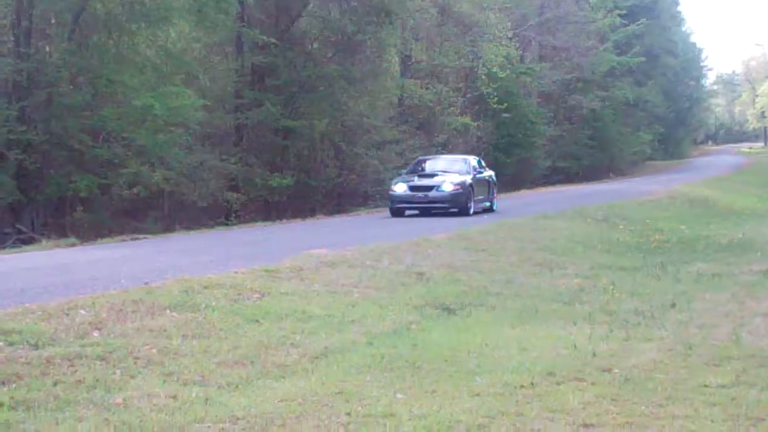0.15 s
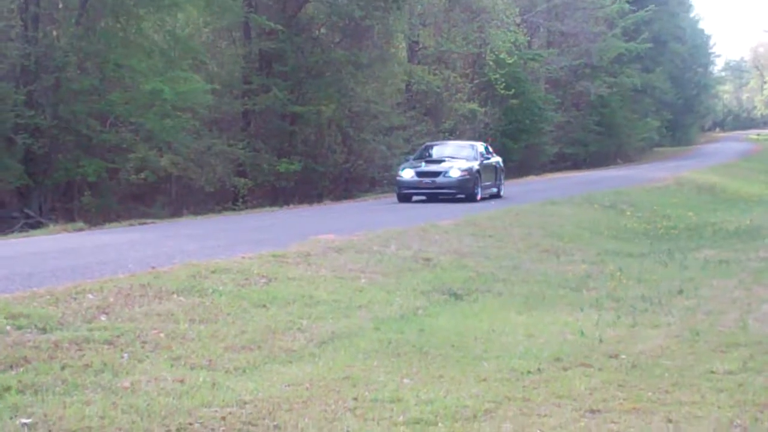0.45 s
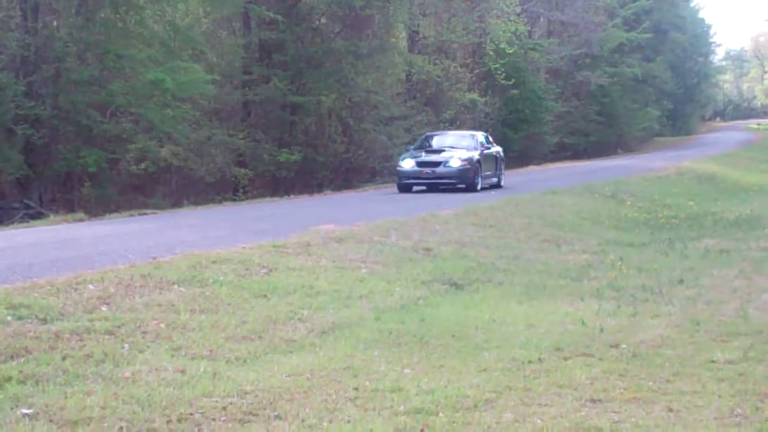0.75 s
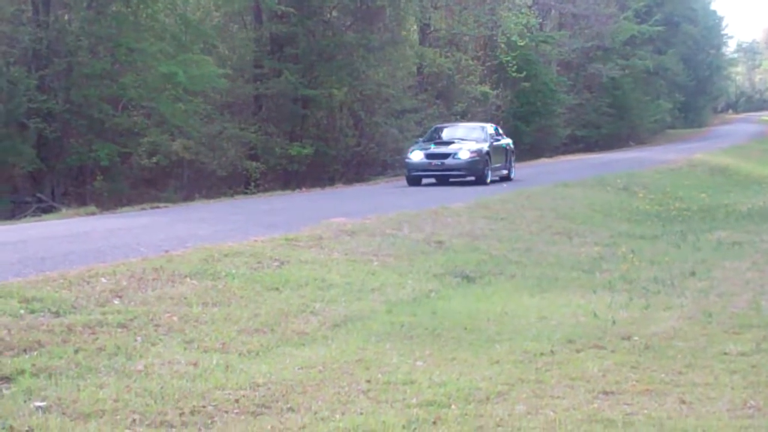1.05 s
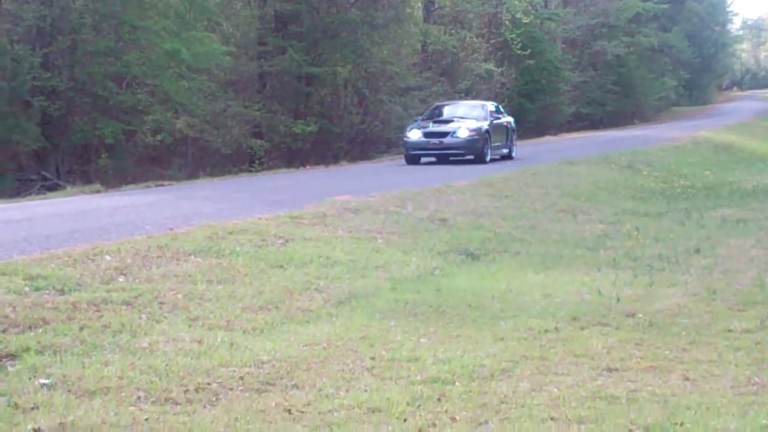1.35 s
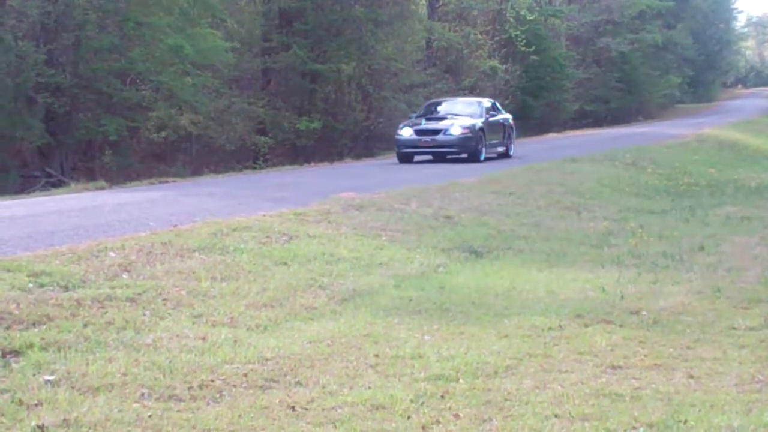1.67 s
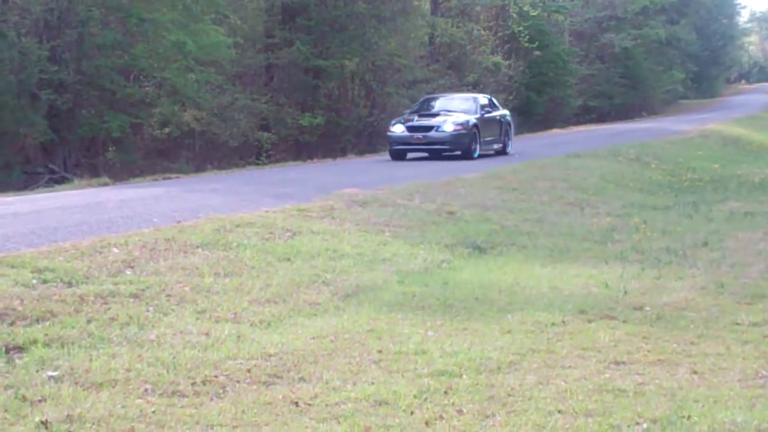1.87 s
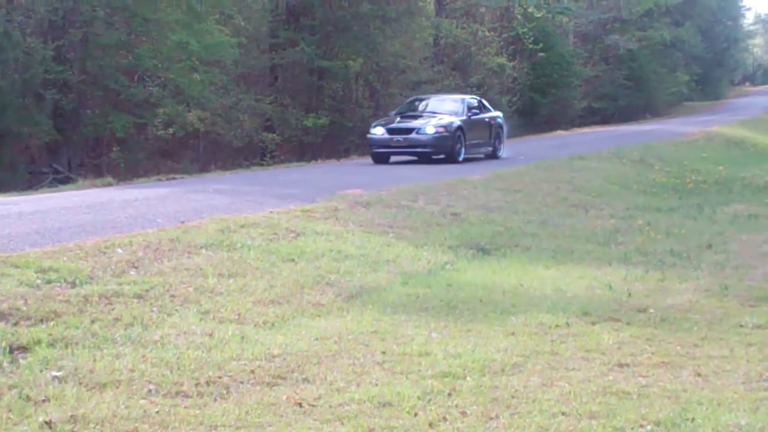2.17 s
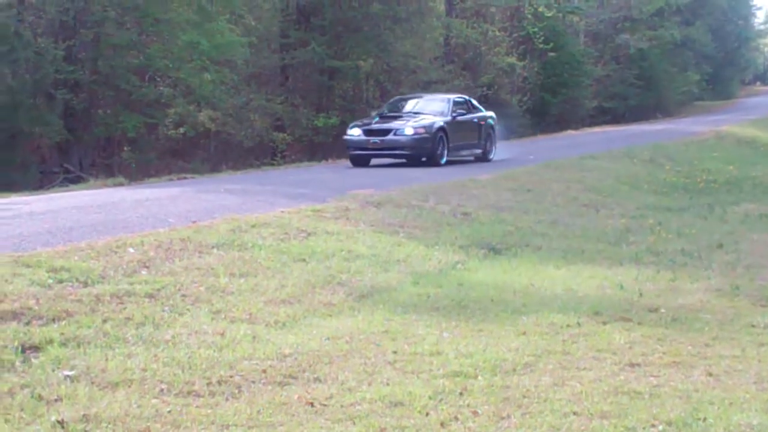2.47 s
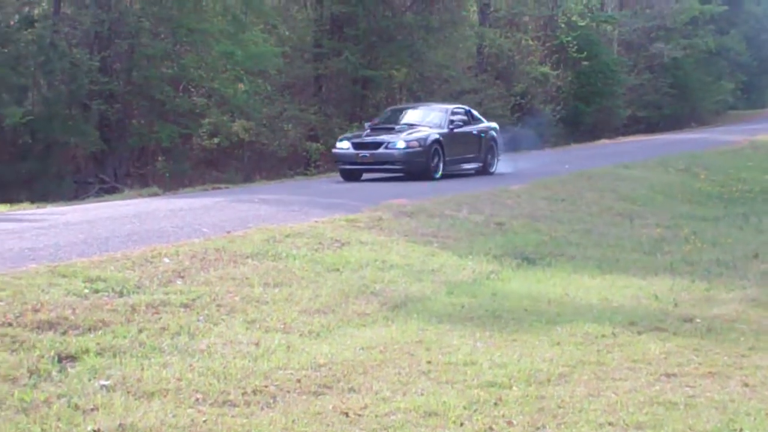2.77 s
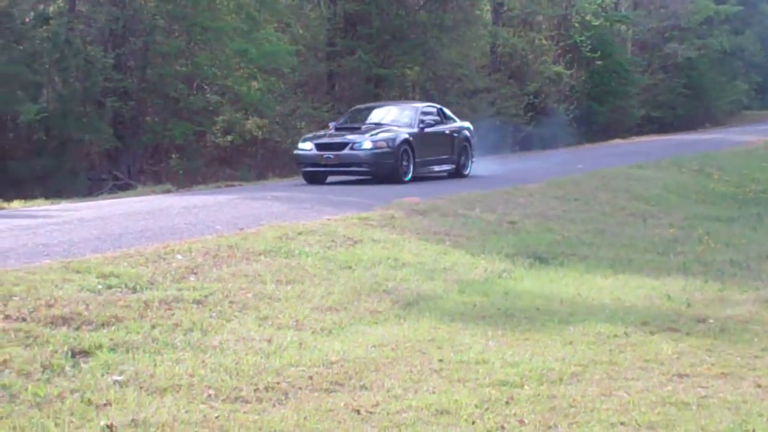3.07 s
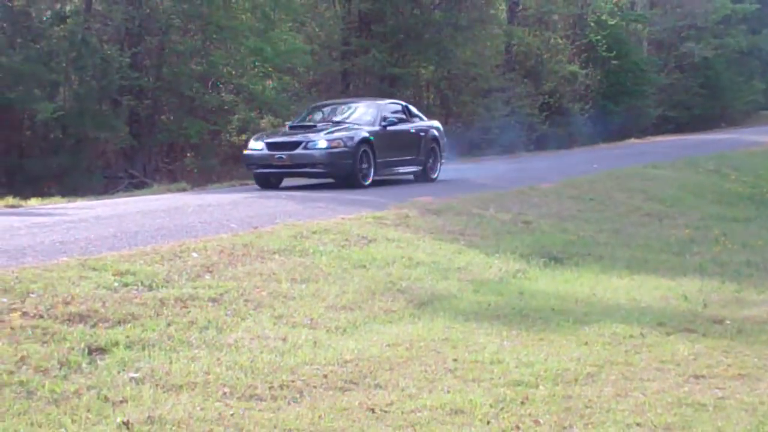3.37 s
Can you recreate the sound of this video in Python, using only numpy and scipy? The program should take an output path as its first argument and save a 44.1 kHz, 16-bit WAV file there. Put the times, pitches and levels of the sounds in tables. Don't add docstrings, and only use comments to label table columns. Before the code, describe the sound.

Car burnout: a throaty engine climbs to a raspy howl over squealing, hissing tyres.

```python
import sys
import numpy as np
from scipy import signal
from scipy.fft import rfft, irfft, next_fast_len
from scipy.io import wavfile
from scipy.ndimage import uniform_filter1d

SR = 44100
rng = np.random.default_rng(int(sys.argv[2]) if len(sys.argv) > 2 else 0)


def bounce(signal):
    frames = np.transpose(np.atleast_2d(signal))
    limited = np.clip(frames, -1, 1)
    pcm = np.round(limited * 32767).astype(np.int16)
    wavfile.write(sys.argv[1], SR, pcm)


def boost_factor(decibels):
    exponent = np.asarray(decibels, float) / 20
    return 10 ** exponent


N = 155232

# time [s], slide hiss level [dB], squeal pitch [Hz], squeal level [dB].
TYRE_SLIDE = [(.11, -49, 1161, -45.5), (.5, -44.5, 1160, -39), (.742, -46, 1186, -62),
              (.75, -36, 1238, -44), (.77, -36.5, 1247, -41), (.785, -38.5, 1170, -42),
              (.882, -42.5, 1100, -29), (.892, -34.5, 1119, -37), (1.04, -32.5, 1145, -31),
              (1.62, -29.5, 1205, -21.5), (2.2, -27.5, 1257, -31), (2.44, -29, 1287, -18),
              (2.66, -29.5, 1232, -24), (2.8, -27, 1130, -30), (3.07, -28.5, 1084, -18),
              (3.11, -31, 1150, -20.5), (3.2, -30.5, 1240, -17.5), (3.52, -31.5, 1268, -20)]


def unit(x):
    return x / np.sqrt(np.mean(x ** 2) + 1e-20)


def along(points, hz):
    f, v = np.transpose(points)
    return np.interp(np.log(hz + 1), np.log(f + 1), v)


def curves(rows):
    s, *cols = np.transpose(rows)
    return [np.interp(np.arange(N) / SR, s, c) for c in cols]


def wobble(rate):
    knots = rng.standard_normal(400)
    return np.interp(np.arange(N) * rate / SR, np.arange(len(knots)), knots)


def filtered(x, response):
    m = next_fast_len(N + SR // 2)
    spectrum = rfft(x, m) * response(np.fft.rfftfreq(m, 1 / SR))
    return irfft(spectrum, m)[..., :N]


def resonances(peaks):
    return lambda f: sum(boost_factor(db) * 1j * f * w / (c * c - f * f + 1j * f * w) for c, w, db in peaks)


def engine(rasp_hz):
    # time [s], firing rate [Hz], exhaust level [dB], throttle lifted [0-1], roughness [0-1], rasp [dB].
    engine_run = [(.11, 65.44, -22, 0, 0.09, -58.5), (.33, 102.8, -14.5, 1, 0.1, -48),
                  (.56, 135.9, -16, 0.68, 0.11, -34), (.76, 139.7, -23, 1, 0.2, -32),
                  (.8, 142, -16, 0.3, 0, -47), (.97, 197.6, -18, 0.06, 0.06, -32.5),
                  (1.06, 203, -19, 0, 0, -28), (1.15, 197, -20, 0.04, .03, -29),
                  (1.34, 232.3, -18.5, 0.04, 0.04, -28), (2.27, 369.7, -20.5, 0.03, 0.02, -21),
                  (2.55, 395.9, -23.5, 0.06, 0.05, -21.5), (2.645, 397.9, -24.5, 0.83, 0.1, -24.5),
                  (2.675, 379.6, -21.5, 0.99, 0.05, -21.5), (3.05, 325.3, -17, 1, 0.14, -37),
                  (3.12, 337, -16, 0.46, 0.77, -31), (3.22, 352.3, -17, 0.3, 0.07, -21.5),
                  (3.35, 289.4, -17.5, 0.32, 0, -25), (3.52, 298, -18, 0.19, 0.01, -21)]
    # order, level when pulling [dB], level with the throttle lifted [dB].
    cycle_orders = [(2, -18, -2.5), (3, -19.5, 1.5), (4, -10.5, -10.5), (5, -5.5, -13.5), (6, -1.5, -22),
                    (7, -12, -9), (8, 2, -1), (9, -17, -8), (10, -16.5, -7), (11, -15, -6.5),
                    (12, -31, -17), (13, -22, -16.5), (14, -9, -19.5), (15, -8.5, -18.5), (16, -8, -22)]
    # centre [Hz], width [Hz], level [dB].
    pipe_modes = [(168.8, 37, 0.5), (296, 190, -9), (635.5, 42, -7), (778.7, 31, 7.5)]
    high_order_db, high_scatter_db, third_harmonic_db = -31, 1.5, 6
    order_wobble_db, rasp_wobble_db = 1.1, 4.5
    sixth_sag_db_per_hz = 0.1007
    pipe_low_hz, rasp_width_hz = 80.4, 117

    firing, level_db, lifted, rough, rasp_db = curves(engine_run)
    firing = uniform_filter1d(firing, size=1800, mode="nearest")
    lifted, rough = np.clip(lifted, 0, 1), np.clip(rough, 0, 1)
    cycle = 2 * np.pi * np.cumsum(firing / 8) / SR + .018 * wobble(25)

    def tone(k, db, sway_db):
        return boost_factor(db + sway_db * wobble(11)) * np.sin(k * cycle + 7 * rng.random())

    exhaust = 0
    for k, pull, lift in cycle_orders:
        db = pull + (lift - pull) * lifted
        if k == 6:
            db = db - sixth_sag_db_per_hz * (firing - 230)
        exhaust = exhaust + tone(k, db, order_wobble_db)
    for k in range(17, 30):
        db = high_order_db + high_scatter_db * rng.normal() + third_harmonic_db * (k % 8 == 0)
        exhaust = exhaust + tone(k, db, rasp_wobble_db)

    rasp = 0
    for k in range(20, 56):
        detune = (k * firing / 8 - rasp_hz) / rasp_width_hz
        rasp = rasp + tone(k, rasp_db - 6, rasp_wobble_db) / (1 + detune ** 4)

    puffs = unit(rng.standard_normal(N) * np.exp(1.5 * np.cos(8 * cycle)) * boost_factor(4 * wobble(40)))
    puffs = 22 * filtered(puffs, lambda f: 1 / (1 + 1j * f / 190) ** 3)
    blend = np.sqrt(1 - rough) * exhaust + np.sqrt(rough) * puffs

    def pipe(f):
        return resonances(pipe_modes)(f) / (1 - 1j * pipe_low_hz / (f + 1)) ** 3

    return filtered(boost_factor(level_db + 6) * blend, pipe) + rasp


def rush(gain, patchy_db):
    # frequency [Hz], likeness [0-1].
    likeness = [(300, 1), (1200, 0.94), (2500, 0.88), (5000, 0.39), (13000, 0.56)]
    z = signal.stft(rng.standard_normal((2, N)), nperseg=512)[2]
    patches = uniform_filter1d(rng.standard_normal(z.shape[1:]), 8, 0)
    patches = uniform_filter1d(patches, 8, 1)
    pair = signal.istft(z * boost_factor(patchy_db * unit(patches)), nperseg=512)[1][:, :N]

    def spread(hz):
        angle = np.arccos(np.clip(along(likeness, hz), -1, 1)) / 2
        return gain(hz) * [np.cos(angle), np.sin(angle)]

    mid, side = filtered(pair, spread)
    return unit(np.array([mid + side, mid - side]))


def tyres():
    # frequency [Hz], density [dB per Hz].
    scrub_spectrum = [(90, -51), (420, -9.5), (700, -1.5), (1000, -5.5), (1250, 0.5), (1450, -12),
                      (2200, -16.5), (3500, -27)]
    # frequency [Hz], density [dB per Hz].
    hiss_spectrum = [(880, -76), (1500, -8), (2130, -7.5), (3410, -9), (4160, -8.5), (5360, -6.5),
                     (10300, -12.5), (13400, -8.5), (14300, -10.5)]
    # multiple of squeal pitch, width [Hz], level over hiss [dB], fade [dB per s].
    tread_whistles = [
        (2.31, 45, -24, -1),
        (2.76, 60, -17, 1),
        (4.36, 260, -5, 5.5),
    ]
    # centre time [s], half length [s], pitch [Hz], level [dB].
    tread_bites = [
        (0.758, 0.006, 5220, -29),
        (0.761, 0.0071, 3350, -31.5),
        (0.852, 0.011, 3000, -38.5),
        (0.896, 0.0084, 3000, -36),
        (0.942, 0.016, 3000, -33),
        (1.007, 0.034, 3050, -45),
    ]
    squeal_width_hz, squeal_trim_db, scrub_trim_db = 44, -9.5, 2.5
    partner_ratio, partner_db = 1.08, -3.5
    whistle_grows = .5

    t = np.arange(N) / SR
    hiss_db, squeal_hz, squeal_db = curves(TYRE_SLIDE)
    turn = 2 * np.pi * np.cumsum(squeal_hz) / SR

    def narrow(hz):
        return unit(filtered(rng.standard_normal(N), lambda f: 1 / (1 + (f / hz) ** 2)))

    def band(ratio, hz):
        return narrow(hz) * np.cos(ratio * turn) + narrow(hz) * np.sin(ratio * turn)

    pair = band(1, squeal_width_hz) + boost_factor(partner_db) * band(partner_ratio, squeal_width_hz)
    squeal = boost_factor(squeal_db + squeal_trim_db + 0.5 * wobble(29.96)) * pair

    slip_db = hiss_db + whistle_grows * (hiss_db + 33)
    whistles = 0
    for ratio, hz, db, fade in tread_whistles:
        whistle_db = slip_db + db - fade * t + 3.75 * wobble(8.06)
        whistles = whistles + boost_factor(whistle_db) * band(ratio, hz)

    chirps = 0
    for s, half, hz, db in tread_bites:
        chirps = chirps + boost_factor(db) * np.exp(-((t - s) / half) ** 4) * np.sin(2 * np.pi * hz * t)
    chirps = chirps * (0.79 + .5 * narrow(150))

    scrub = rush(lambda f: boost_factor(along(scrub_spectrum, f)), patchy_db=0.5)
    scrub = boost_factor(hiss_db + scrub_trim_db + 2.04 * wobble(55)) * scrub
    hiss = rush(lambda f: boost_factor(along(hiss_spectrum, f)), patchy_db=1.0)
    hiss = boost_factor(hiss_db + 0.49 * wobble(22.62) + 1.2 * wobble(100)) * hiss
    return squeal + whistles + chirps, scrub + hiss


def woods(x):
    t60_s, gap_s = 0.61, .012
    t = np.arange(SR // 2) / SR
    tail = rng.standard_normal((2, len(t))) * boost_factor(-60 * t / t60_s) * (t > gap_s)
    return signal.fftconvolve(x[None], tail / np.linalg.norm(tail[0]), axes=1)[:, :N]


def scene():
    woods_db = -17
    squeal, slide = tyres()
    squeal_hz = curves(TYRE_SLIDE)[1]
    car = engine(squeal_hz) + squeal
    return car + boost_factor(woods_db) * woods(car) + slide


def band_limit(x):
    return signal.sosfilt(signal.butter(12, 15340, fs=SR, output="sos"), x)


def record(dry):
    # frequency [Hz], left over right [dB].
    port_balance = [(150, 0.44), (1200, 1.26), (4000, 4.5), (8000, 5.5), (13000, 7)]
    start_s, low_hz, top_hz = .108, 45, 14260

    def ports(hz):
        balance = boost_factor(along(port_balance, hz) * [[.5], [-.5]])
        return balance * (hz < top_hz) * hz ** 2 / (hz ** 2 + low_hz ** 2)

    heard = filtered(dry, ports) * (np.arange(N) > start_s * SR)
    return band_limit(heard)


dry = scene()
out = record(dry)
bounce(out)
```